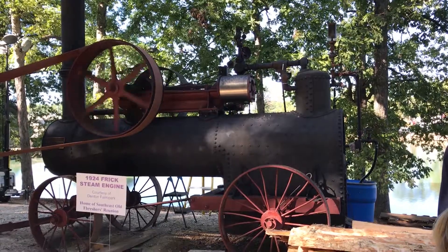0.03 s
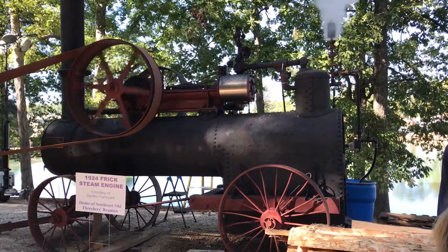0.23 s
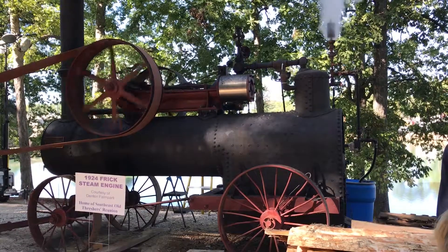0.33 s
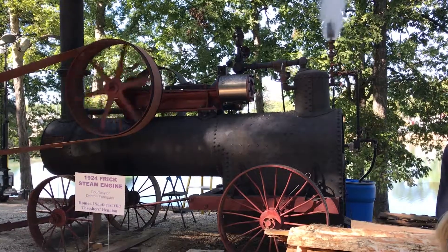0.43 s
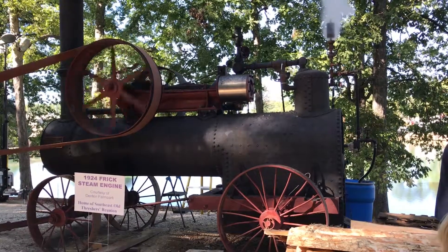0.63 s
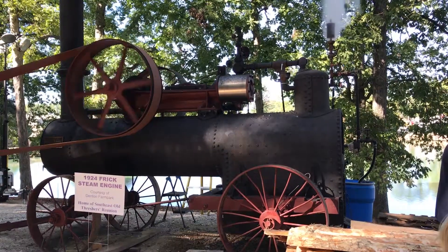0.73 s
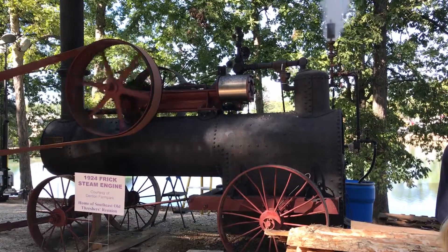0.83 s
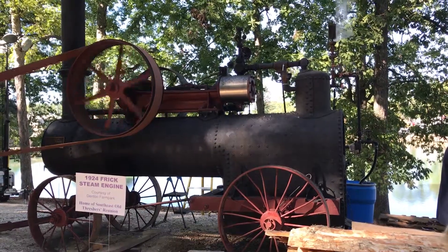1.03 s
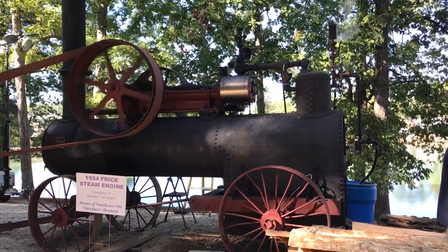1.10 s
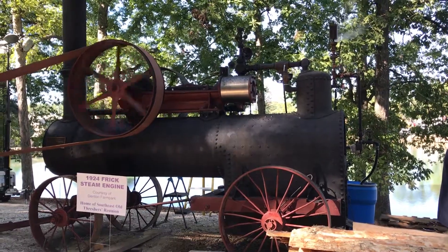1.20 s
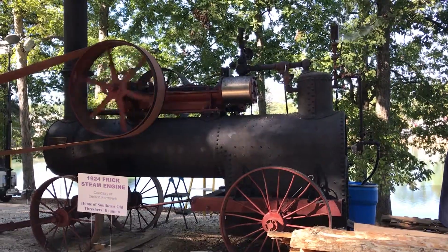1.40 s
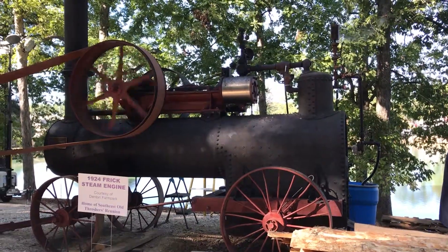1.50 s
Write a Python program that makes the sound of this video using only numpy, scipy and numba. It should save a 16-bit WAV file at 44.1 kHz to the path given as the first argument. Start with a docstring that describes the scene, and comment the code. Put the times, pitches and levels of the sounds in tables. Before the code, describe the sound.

A steam whistle on an old engine spits, then swells into one short, loud, bright note with strong hiss. It cuts off and echoes briefly among trees, leaving the engine's quiet knocking and puffing and faint bird chirps.

```python
"""Under trees, an old steam engine ticks over and gives one short, loud whistle blast.
Wet steam spits as the valve opens; the pipe starts breathy, swells to a bright tone over the jet's hiss
and echoes briefly. Each engine stroke knocks, rattles and puffs. A bird chirps.
Automatic gain control sinks under the blast and lets the engine's beat come back slowly."""
import sys
import numpy as np
from scipy import signal
from scipy.fft import rfft, irfft
from scipy.io import wavfile
from scipy.ndimage import uniform_filter1d
from numba import njit

SR = 44100
rng = np.random.default_rng(int(sys.argv[2]) if len(sys.argv) > 2 else 0)


def log_audio(samples):
    """Write samples as a 16-bit WAV file to the path given in sys.argv[1]."""
    # one column per channel
    frames = np.atleast_2d(samples).T
    # limit to full scale, then quantise
    limited = np.clip(frames, -1, 1)
    pcm = np.round(limited * 32767).astype(np.int16)
    wavfile.write(sys.argv[1], SR, pcm)


N = 68355
T = np.arange(N) / SR


def whistle():
    """Steam-blown pipe: strong tone, fluttering overtones, jet hiss pulsing with each cycle."""
    pitch = [(.21, 426.5), (.275, 417.8), (.305, 425.2), (.335, 422.6), (.41, 424.1), (.48, 428.4),
             (.58, 426.2), (.71, 427), (.78, 433.6), (.83, 427.6), (.91, 431.2)]  # fundamental: t/s, f/Hz
    blow = [(.205, -53), (.216, -31), (.223, -13), (.24, -11.5), (.262, -3), (.32, 0), (.39, 5), (.52, 4.5),
            (.7, 3.5), (.86, 7.5), (.904, 4), (.921, -27), (.94, -75)]  # tone envelope: t/s, level/dB
    overtones = [(2, -21.5, 0.06, 262), (3, -14, .14, 152), (4, -15.5, 0.25, 1500.5), (5, -38, 0.34, 1500),
                 (6, -27, 0.22, 1500)]  # multiple, relative level/dB, flutter depth, ring-out/(dB/s)
    brightness = [(.22, -20), (.305, -15.5), (.335, 1.5), (.415, 2.5), (.47, -0.5), (.655, 0), (.705, 5),
                  (.77, -4), (.825, 0), (.9, -3)]  # overtone gain as the tone locks in: t/s, level/dB
    jet_envelope = [(0, -60), (.15, -44), (.19, -39), (.225, -26.5), (.255, -23), (.31, -15.5), (.4, -10),
                    (.53, -8.5), (.65, -7.5), (.897, -3.5), (.915, -22), (.95, -75)]  # t/s, level/dB
    jet_spectrum = [(60, -37), (150, -12), (240, 0.5), (550, 0), (700, -0.5), (1100, -0.5), (2000, -2),
                    (3000, -2), (4200, -2), (4900, -8), (6000, -6.5), (9300, -9.5), (10200, -14),
                    (12000, -11.5), (15000, -14)]  # f/Hz, level/dB
    pipe_resonances = [(427, 38, 10), (687, 89, 4.5), (1250, 76, 6.5), (1457, 170, 10.5), (1737, 66, 11),
                       (2520, 170, 8.5), (3340, 77, 3.5)]  # stirred by the jet: f/Hz, width/Hz, lift/dB
    jitter, jitter_hz = .0057, 68
    flutter_db, flutter_hz = .4, 42.7
    pulse_depth, flicker_db = .3, .33
    phase = 2 * np.pi * np.cumsum(curve(pitch) * (1 + jitter * drift(jitter_hz))) / SR
    blow_db = curve(blow)
    tone = amp(blow_db + flutter_db * drift(flutter_hz)) * np.sin(phase)
    drive_db = blow_db + curve(brightness)
    for multiple, db, depth, fall_db_per_s in overtones:
        fall_db = fall_db_per_s * T
        held_db = np.maximum.accumulate(drive_db + fall_db) - fall_db  # ring-out limits the fall
        flutter = 1 + depth * (drift(flutter_hz) + 1j * drift(flutter_hz))
        tone += amp(held_db + db) * (flutter * np.exp(1j * multiple * phase)).imag
    jet = rng.standard_normal(N) * (1 + pulse_depth * np.sin(phase))
    jet *= amp(flicker_db * drift(rate_hz=100))
    hiss = amp(curve(jet_envelope)) * colour(jet, jet_spectrum, pipe_resonances)
    return np.sqrt(2) * tone + hiss


def spit():
    """Wet steam splutters through the pipe as the valve opens."""
    envelope = [(.205, -43), (.228, -24.5), (.29, -13.5), (.315, -17.5), (.36, -54), (.42, -84)]  # t/s, level/dB
    spectrum = [(60, -19), (200, -5.5), (350, -1.5), (700, -1), (1100, -3), (1600, -5.5), (2000, -11),
                (4000, -9.5), (8000, -24.5), (15000, -32)]  # f/Hz, level/dB
    resonance = [(1468, 60, 13)]  # untuned pipe overtone: f/Hz, width/Hz, lift/dB
    flicker_db = 3
    steam = colour(rng.standard_normal(N), spectrum, resonance)
    splutter = unit(steam * amp(flicker_db * drift(rate_hz=170)))
    return amp(curve(envelope)) * splutter


def engine():
    """Each stroke gives a knock, a dull rattle and a steam puff over the rumble of the gear."""
    beats = [(-.024, -26, -26, -27.5), (.099, -18, -28.5, -30.5), (0.226, -30, -25.5, -40),
             (0.356, -29, -23, -26), (.483, -29, -32, -36), (0.611, -30, -22, -42), (.738, -38.5, -29, -34),
             (.866, -35, -14, -37), (1.123, -18, -27, -33), (1.248, -34, -28, -30),
             (1.376, -31, -24.5, -34), (1.505, -43, -24.5, -27)]  # t/s, knock level/dB, rattle level/dB, puff level/dB
    rattle_spectrum = [(30, -26), (50, 0.5), (90, -12), (180, -9), (260, -1.5), (370, 1), (520, -13.5),
                       (900, -20), (2500, -42), (15000, -68)]  # f/Hz, level/dB
    puff_spectrum = [(60, -42), (400, -27), (800, 8.5), (1500, 6.5), (2500, -5.5), (4000, -8.5),
                     (7000, -29.5), (15000, -36)]  # f/Hz, level/dB
    idle_spectrum = [(20, -26), (45, 1), (75, -0.5), (130, 0), (300, -2.5), (550, -13), (1400, -13.5),
                     (2200, -19.5), (4000, -25.5), (7000, -33.5), (10000, -40.5), (15000, -44)]  # running gear and leaking steam: f/Hz, level/dB
    idle_db, flicker_db = -34, 2.5
    rattle, puff = noise(rattle_spectrum), noise(puff_spectrum)
    out = amp(idle_db + flicker_db * drift(rate_hz=32)) * noise(idle_spectrum)
    for start_s, knock_db, rattle_db, puff_db in beats:
        out += amp(knock_db) * knock(start_s)
        out += amp(rattle_db) * stroke(start_s, rise_s=.0028, decay_s=.027) * rattle
        out += amp(puff_db) * stroke(start_s, rise_s=.0029, decay_s=.014) * puff
    return out


def knock(start_s, rise_s=.0017):
    """One blow rings the heavy frame."""
    frame_modes = [(47.5, -4.5, 0.18), (100, -10.5, 0.17), (248, -0.5, 0.063), (311, 3, 0.042),
                   (366, -19, .04)]  # f/Hz, level/dB, t60/s
    age_s = np.maximum(T - start_s, 0)
    ring = sum(amp(db - 60 * age_s / t60_s) * np.sin(2 * np.pi * hz * age_s)
               for hz, db, t60_s in frame_modes)
    return ring * np.minimum(age_s / rise_s, 1)


def stroke(start_s, rise_s, decay_s):
    """Envelope of one beat and its weaker rebound, summed in power."""
    rebound_s, rebound_db = .0248, -4.5
    age_s = np.maximum(T - start_s - np.array([[0], [rebound_s]]), 0)
    beat, rebound = np.minimum(age_s / rise_s, 1) * np.exp(-age_s / decay_s)
    return np.hypot(beat, amp(rebound_db) * rebound)


def bird():
    """Thin, high chirps with a slight arch in pitch."""
    chirps = [(0.155, 0.039, -42.5), (1.188, 0.03, -44), (1.437, 0.043, -42.5)]  # t/s, length/s, level/dB
    pitch_hz, arch_hz, waver_hz, octave_db = 7040, 101, 35, -17
    out = np.zeros(N)
    for start_s, length_s, db in chirps:
        arch = np.sin(np.pi * np.clip((T - start_s) / length_s, 0, 1))
        hz = pitch_hz + arch_hz * arch + waver_hz * drift(rate_hz=200)
        phase = 2 * np.pi * np.cumsum(hz) / SR
        out += amp(db) * arch * (np.sin(phase) + amp(octave_db) * np.sin(2 * phase))
    return out


def grove(x):
    """Trunks and leaves scatter a short tail; two dull echoes return from further off."""
    decay = [(200, 0.8), (430, 1.8), (1300, 0.8), (4000, 0.63), (12000, 0.53)]  # tail length: f/Hz, t60/s
    spectrum = [(200, -19), (400, -42), (460, -41.5), (650, -19.5), (1300, -17.5), (1750, -19.5),
                (2300, -13.5), (4000, -14.5), (12000, -18.5)]  # tail gain: f/Hz, level/dB
    gap_s = .008
    echo_s, echo_db, lowpass_hz = (.0743, .15), (-26.5, -25.5), 596.3
    scatter = rng.standard_normal(SR) * (np.arange(SR) > gap_s * SR)
    hz, age_s, bands = signal.stft(scatter, SR, nperseg=256)
    t60_s = read(decay, hz)[:, None]
    bands *= amp(read(spectrum, hz)[:, None] - 60 * age_s / t60_s)
    bands *= np.sqrt(2 * np.log(1000) / (t60_s * SR))  # energy independent of t60
    impulse_response = signal.istft(bands, SR, nperseg=256)[1]
    tail = signal.fftconvolve(x, impulse_response)[:N]
    echoes = sum(amp(db) * np.interp(T - s, T, x, left=0) for s, db in zip(echo_s, echo_db))
    return tail + signal.lfilter(*signal.butter(1, lowpass_hz, fs=SR), echoes)


def amp(db):
    """Decibels to gain."""
    return 10 ** (np.asarray(db) / 20)


def unit(x):
    """Scales to rms 1."""
    return x / np.sqrt(np.mean(x ** 2) + 1e-20)


def curve(points):
    """Interpolates (t/s, value) over the scene."""
    return np.interp(T, *np.transpose(points))


def read(points, hz):
    """Interpolates (f/Hz, value) on a log axis."""
    f, value = np.transpose(points)
    return np.interp(np.log(hz + 1), np.log(f + 1), value)


def drift(rate_hz):
    """Random wander below rate_hz; rms 1."""
    hz = np.fft.rfftfreq(N, 1 / SR)
    lowpass = (hz > 0) / (1 + (hz / rate_hz) ** 4)
    return unit(irfft(rfft(rng.standard_normal(N)) * lowpass, N))


def colour(x, spectrum, resonances=()):
    """Filters x by a spectral shape and resonances; rms 1."""
    hz = np.fft.rfftfreq(N, 1 / SR)
    lift_db = sum(db / (1 + (2 * (hz - f) / width_hz) ** 2) for f, width_hz, db in resonances)
    return unit(irfft(rfft(x) * amp(read(spectrum, hz) + lift_db), N))


def noise(spectrum):
    """Coloured noise; rms 1."""
    return colour(rng.standard_normal(N), spectrum)


def scene():
    """Whistle and bird echoing among the trees, over the engine; mono."""
    calls = whistle() + spit() + bird()
    return (calls + grove(calls) + engine())[None]


@njit
def slew(x, up, down):
    """Follows x with limited rise and fall per sample."""
    out, level = np.zeros(len(x)), 0.
    for i in range(len(x)):
        level += min(max(x[i] - level, -down), up)
        out[i] = level
    return out


def record(dry):
    """Bass roll-off, slow gain control, soft peak ceiling, band limit."""
    highpass_hz, lowpass_hz, ceiling = 36, 15300, .72
    threshold_db, attack_db_per_s, release_db_per_s = -16.5, 80.5, 29
    power_db = 10 * np.log10(abs(uniform_filter1d(dry[0] ** 2, size=600)) + 1e-12)
    excess_db = np.maximum(power_db - threshold_db, 0)
    cut_db = slew(excess_db, attack_db_per_s / SR, release_db_per_s / SR)
    x = signal.sosfilt(signal.butter(4, highpass_hz, "high", fs=SR, output="sos"), dry)
    x *= amp(-cut_db)
    x /= (1 + (x / ceiling) ** 12) ** (1 / 12)
    band_limit = signal.firwin(511, lowpass_hz, window=("kaiser", 9), fs=SR)
    return signal.oaconvolve(x, band_limit[None], "same")


dry = scene()
out = record(dry)
log_audio(out)
```